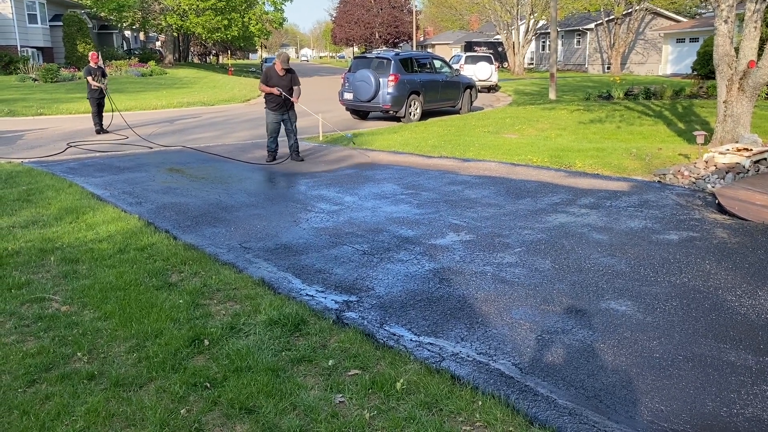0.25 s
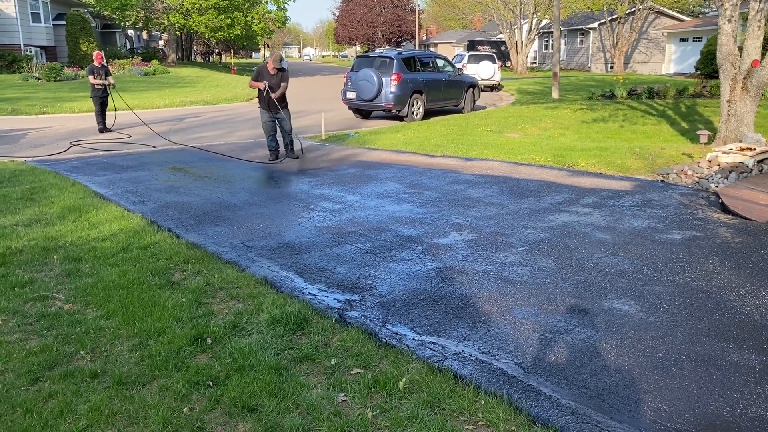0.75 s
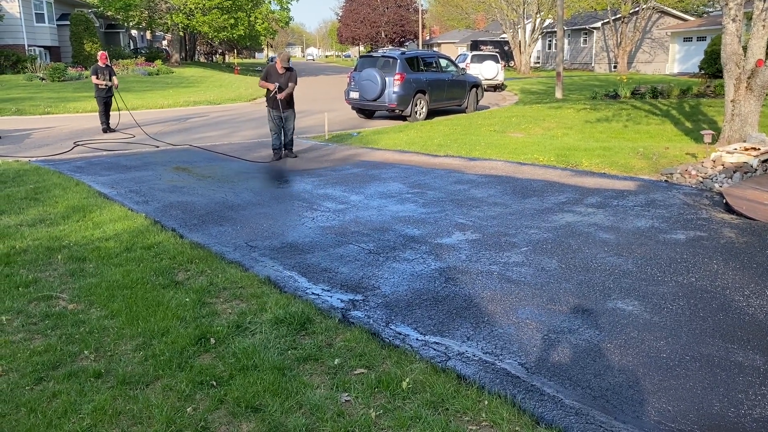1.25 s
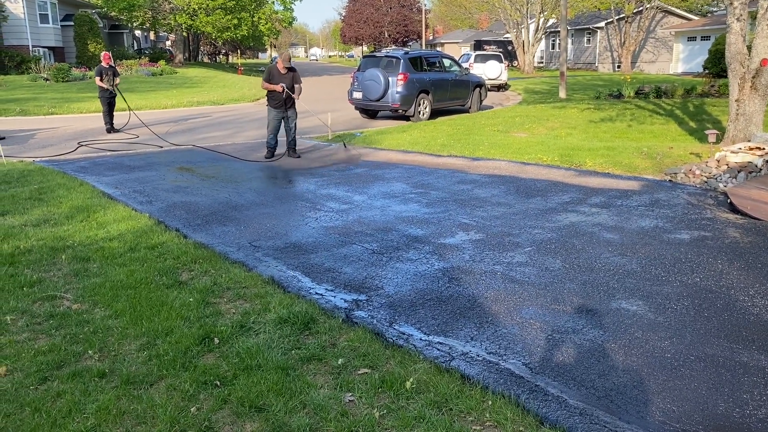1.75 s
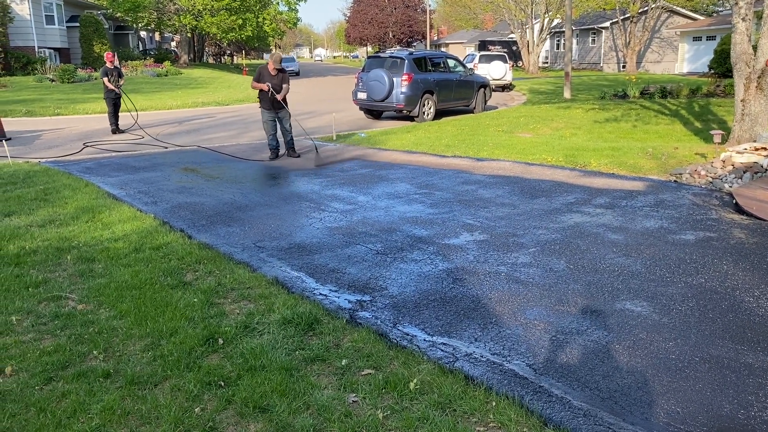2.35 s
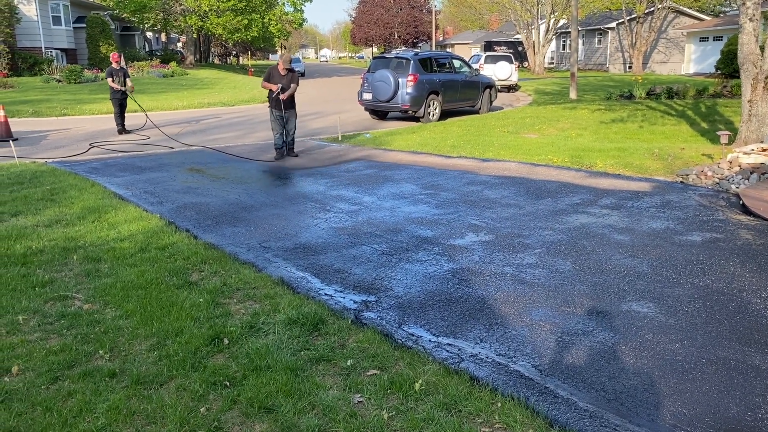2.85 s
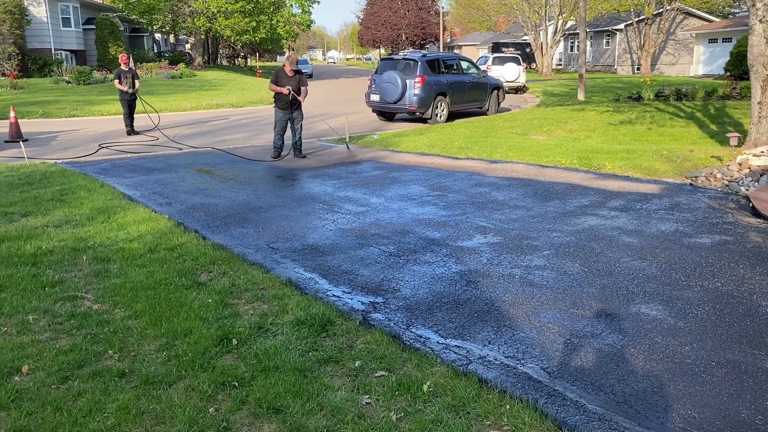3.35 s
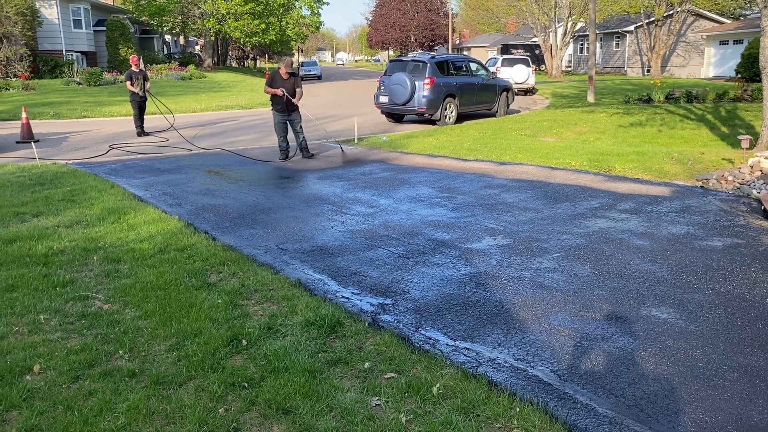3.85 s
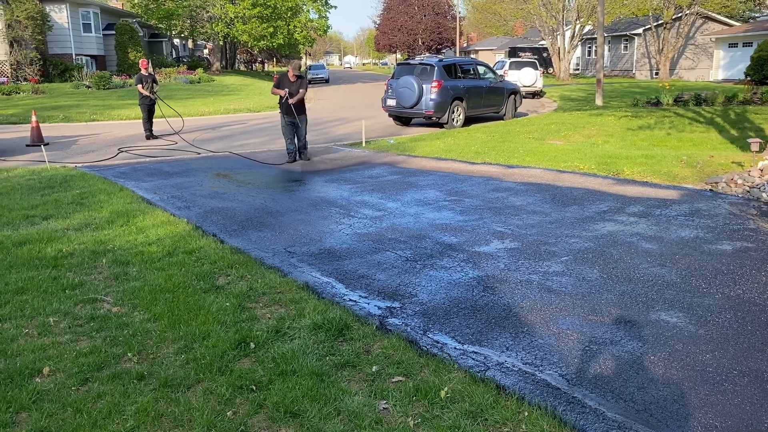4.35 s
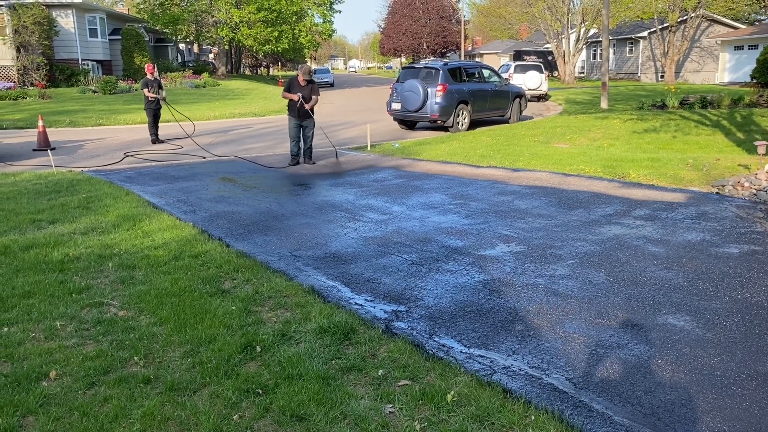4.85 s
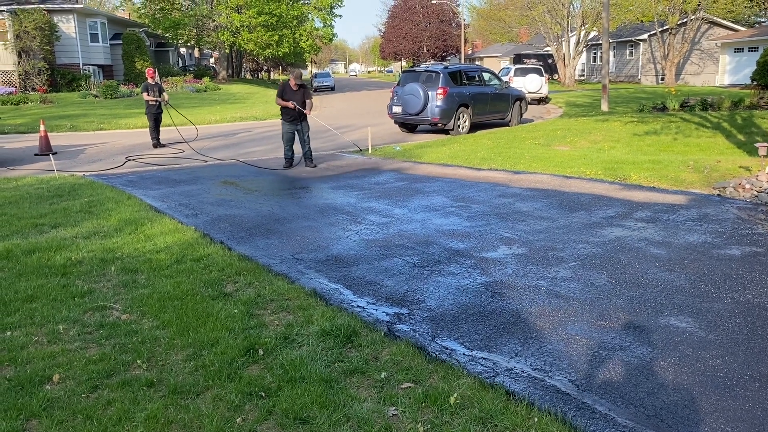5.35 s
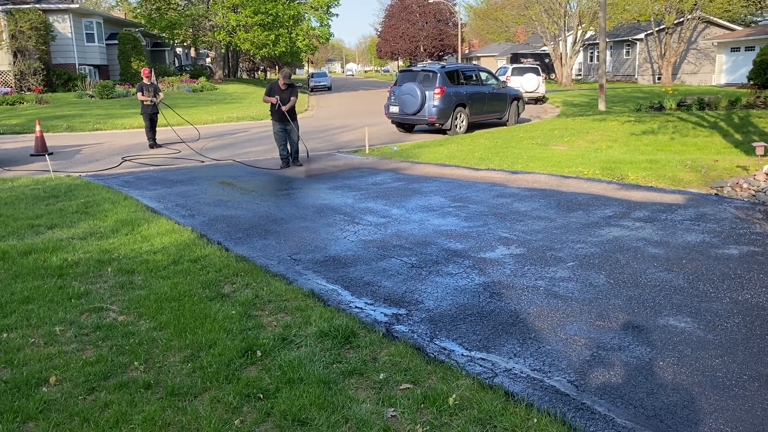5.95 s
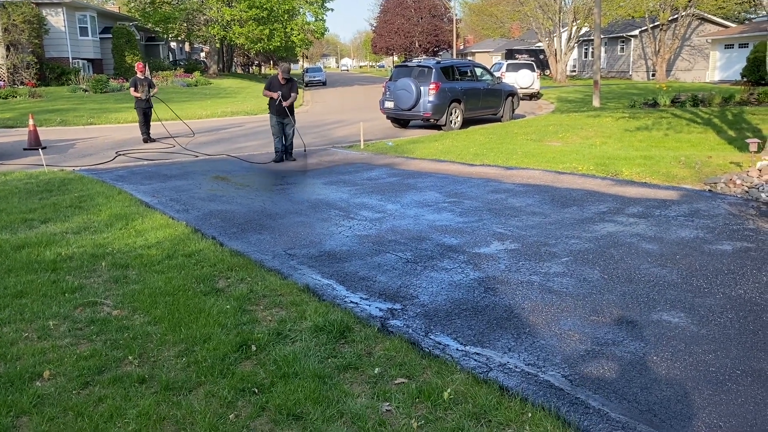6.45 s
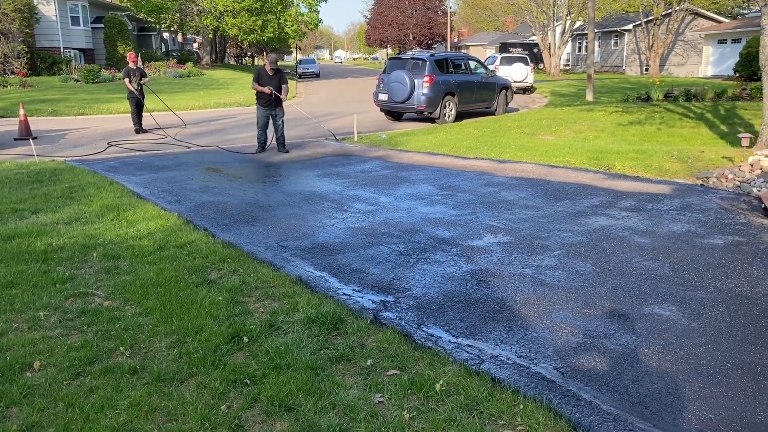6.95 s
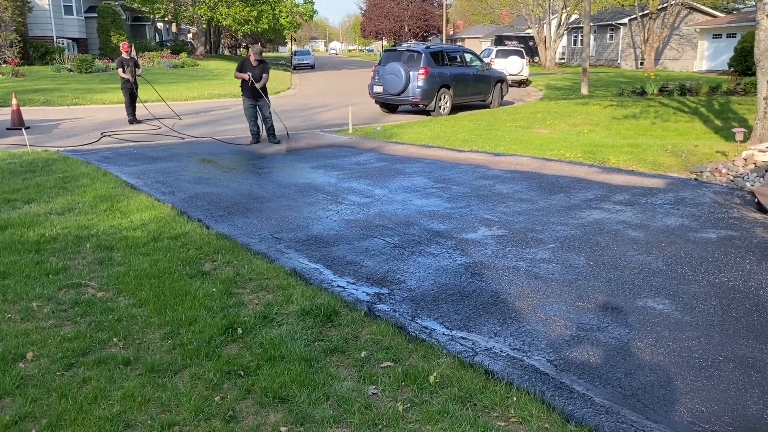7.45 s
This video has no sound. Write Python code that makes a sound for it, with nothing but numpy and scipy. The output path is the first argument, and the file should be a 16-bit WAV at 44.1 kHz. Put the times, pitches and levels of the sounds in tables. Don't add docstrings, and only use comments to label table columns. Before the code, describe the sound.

Continuous pressurised spray hisses over wet paving, sweeping brighter and duller with each stroke and interrupted by tiny gaps as the pump reverses. Under it runs an even, low, buzzing engine hum with a soft roar. The open-air hand-held microphone catches wind rumble throughout; in the last third, gusts strengthen, fingers tick on its case and several low thuds follow, with one strong knock shortly before the end.

```python
import sys
import numpy as np
from scipy import signal
from scipy.fft import rfft, irfft, next_fast_len
from scipy.io import wavfile
from scipy.ndimage import uniform_filter1d, map_coordinates

SR = 44100
rng = np.random.default_rng(int(sys.argv[2]) if len(sys.argv) > 2 else 0)


def volts_from_decibels(level):
    exponent = np.asarray(level, float) / 20
    return 10 ** exponent


def persist_wave(psi):
    counts = np.round(np.clip(psi, -1, 1) * 32767).astype(np.int16)
    wavfile.write(sys.argv[1], SR, np.atleast_2d(counts).T)


N = 339129
SIZE = next_fast_len(N + 4096)
HZ = np.maximum(np.arange(SIZE // 2 + 1) * SR / SIZE, 1)
TIME = np.arange(N) / SR

# (time [s], extra bounce path at the turn [mm],
# path in mid-stroke [mm], fan body at the turn [dB], fan body after it [dB])
WAND_TURNS = [(-.42, 97, 55, 0, 0), (.28, 80, 55, 6, 1.5), (1.1, 105.5, 64.5, 1, -2),
              (1.96, 80.7, 58, 5.5, 1.5), (2.8, 95.4, 59.4, 1, -0.5), (3.65, 78, 60.4, 5, 3),
              (4.54, 99, 58, 1, 1), (5.38, 77.6, 64, 5.5, -.5), (6.19, 95, 59, -1, -6),
              (7.08, 78, 49.5, 0.5, -5), (7.9, 100, 60, -8, -8)]
FAR_MM = 86
MID_STROKE_S = [0.32, .35]
FACING_FROM_S = [0.34, .1]
FACING_UNTIL_S = [0.028, .02]
SWEPT_AWAY_S = [0.31, 0.35]
TURN_DIP_DB, WRIST_S = -1, 0.1
STROKE_LIFT_DB = [0.4, 0.67]

# (stop time [s], restart time [s])
PUMP_REVERSALS = [
    (0.249, 0.305),
    (1.12, 1.169),
    (1.977, 2.025),
    (2.806, 2.859),
    (3.642, 3.696),
    (4.538, 4.587),
    (5.346, 5.396),
    (6.21, 6.262),
    (7.016, 7.064),
]
LINGER_DB = -16

# (frequency [Hz], level [dB per Hz])
SPRAY_SPECTRUM = [(900, -27), (1450, -2.5), (1800, -8), (2150, -5.5), (2700, -6), (3250, -4.5),
                  (3550, -2.5), (4300, -1), (5300, -1.5), (7000, -5), (8500, -5), (10000, -4.5),
                  (12500, -7.5), (16000, -10)]
SPRAY_DB = -38
# (frequency [Hz], level [dB])
PAVING_BOUNCE = [(3000, -0.5), (6000, -8.5), (9000, -5), (14000, -12.5)]
# (time [s], level [dB])
NOZZLE_AIM = [
    (0, -1),
    (1.5, 0.5),
    (2.1, -1),
    (3.3, -0.3),
    (5.2, 0.55),
    (6.1, 0),
    (6.77, 2.5),
    (7.1, 0),
    (7.69, 0),
]
KERB_MS, KERB_DB = 1.43, -12

# (time [s], firing rate [firings per s])
ENGINE_SPEED = [
    (0, 21.355),
    (2.2, 21.35),
    (2.4, 21.425),
    (4.6, 21.43),
    (4.8, 21.405),
    (7.69, 21.4),
]
# (multiple of the firing rate, level [dB])
EXHAUST = [(1, -26), (2, -65.5), (3, -36), (4, -4.5), (5, 1), (6, -7.5), (7, -8.5), (8, -12), (9, -10.5),
           (10, -7), (11, -16), (12, -17.5), (13, -13), (14, -19), (15, -20), (16, -17), (17, -24.5),
           (18, -28), (19, -31.5), (20, -40), (21, -53), (22, -34), (23, -50), (24, -33), (25, -22.5),
           (26, -28), (27, -31), (28, -43), (29, -37), (30, -29), (31, -35), (32, -31), (33, -27),
           (34, -25), (35, -28), (36, -25), (37, -33), (38, -26), (39, -26.5), (40, -21), (41, -20),
           (42, -24), (43, -50), (44, -47), (45, -44), (46, -26.5), (47, -21), (48, -24), (49, -40),
           (50, -25.5), (51, -22), (52, -22)]
EXHAUST_DB, SCATTER_RAD = -34, .4
# (frequency [Hz], level [dB per Hz])
ROAR_SPECTRUM = [(45, -26), (85, -16.5), (150, -5), (300, -14), (620, -20.5), (900, -13), (1200, -21),
                 (1450, -23.5), (1720, -25), (2050, -20.5), (2800, -25), (3500, -25), (5500, -32.5),
                 (16000, -38)]
ROAR_DB = -39
# (frequency [Hz], level [dB])
ROAR_DIFFUSE = [(50, -25), (300, -0.5), (900, -6.5), (1500, 5), (2500, 0.5), (5000, 2), (16000, -13)]
# (time [s], level [dB])
ENGINE_FACING = [
    (0, -0.7),
    (1, -0.23),
    (5, 0.3),
    (5.5, -.5),
    (7, -1.5),
    (7.69, -1),
]

# (start time [s], hold [s], level [dB])
GUSTS = [(0, .02, -39), (.2, .03, -33), (.85, .02, -42), (1.8, 0.19, -36), (2.08, .12, -45),
         (2.2, 0.17, -35), (2.727, 0.015, -36), (3.484, 0.022, -37), (3.658, 0.21, -33.5), (4.58, .04, -45),
         (4.89, 0.045, -38), (5.25, .05, -37), (5.437, .1, -29.5), (5.627, 0.27, -30), (5.845, 0.32, -31.5),
         (6.2, 0.11, -29), (6.47, 0.34, -35), (6.955, 0.042, -31.5), (7.133, 0.18, -28.5),
         (7.33, 0.21, -31.5), (7.643, .1, -28)]
CALM_DB, RISE_DB_PER_S, FALL_DB_PER_S = -42, 200, 154

# (time [s], peak level [dB], frequency [Hz], 60 dB decay time [s])
BUMPS = [(5.489, -12.5, 70, .1), (5.677, -16, 62, .09), (6.684, -13.5, 55, .09), (5.724, -21, 75, .06),
         (6.27, -21, 55, .08), (7.66, -20, 48, .1), (6.216, -20, 90, .05), (6.312, -21, 120, .06),
         (6.965, -21, 120, .06), (7.405, -21, 80, .05), (7.279, -11, 140, .03), (7.2864, -3, 100, .06),
         (7.2866, -9, 350, .026), (7.2866, -20, 560, .02)]
# (time [s], peak level [dB], frequency [Hz])
TICKS = [
    (5.389, -36, 1000),
    (5.397, -34.5, 990),
    (5.397, -39.5, 2200),
    (5.479, -37.5, 890),
    (5.479, -43, 2450),
    (5.517, -37, 1800),
    (5.541, -42, 800),
]

# (frequency [Hz], phase [radians])
PORT_LEAD = [(0, 0), (110, .27), (330, .6), (900, 1.25), (1250, 2.9), (1480, 1.3), (1800, 3.3), (2330, 6.6),
             (4000, 6.8), (5340, 7.75), (6290, 7.0), (7100, 6.25), (9000, 3.14), (11200, 0), (13350, -3.14),
             (15400, -6.3), (22050, -15.7)]
# (frequency [Hz], phase [radians])
SWING_LEAD = [(3300, 0.43), (4500, 0.38), (5600, 1.9), (7000, 1.54), (8400, 0)]
# (frequency [Hz], left minus right [dB])
PORT_BALANCE = [(60, .5), (250, 1), (420, 1.5), (620, 5.5), (1050, 4.5), (1400, 0), (2000, 0), (2700, 1.5),
                (6300, .5), (7200, 2.3), (8300, 0)]


def rms_one(x):
    return x / np.sqrt(np.mean(x ** 2) + 1e-20)


def in_time(rows):
    s, *columns = np.transpose(rows)
    return [np.interp(TIME, s, c) for c in columns]


def at_hz(points, hz):
    table_hz, value = np.transpose(points)
    return np.interp(np.log(hz), np.log(table_hz), value)


def colour(x, spectrum):
    return irfft(rfft(x, SIZE) * volts_from_decibels(at_hz(spectrum, HZ)), SIZE)[..., :N]


def drift(rate):
    r = np.exp(-80 * np.pi * rate / SR)
    noise = rng.standard_normal(N // 40 + 2002)
    slow = signal.lfilter([1], [1, -2 * r, r * r], noise)[2000:]
    return np.interp(np.arange(N) / 40, np.arange(len(slow)), rms_one(slow))


def ports(x, turned=0):
    lead = np.interp(HZ, *np.transpose(PORT_LEAD)) + turned * np.interp(HZ, *np.transpose(SWING_LEAD))
    half = volts_from_decibels(at_hz(PORT_BALANCE, HZ) / 2) * np.exp(.5j * lead)
    return irfft(rfft(x, SIZE) * np.array([half, 1 / half]), SIZE)[:, :N]


def engine():
    turn = np.cumsum(in_time(ENGINE_SPEED)[0]) / SR + .47 + .002 * drift(3)
    order, db = np.transpose(EXHAUST)
    valley = np.clip((np.roll(db, 1) + np.roll(db, -1)) / 6 - db / 3, 0, 1)
    lead = .35 * valley * (order < 13)
    lead -= .41 * (order - 13) * (order > 13) * (order < 22)
    scatter = SCATTER_RAD * np.where(order > 38, 2.3, 1) * rng.standard_normal(len(order))

    cycle = np.arange(4097) / 4096
    phase = 2 * np.pi * (np.outer(order, cycle) + .2 + lead[:, None]) + scatter[:, None]
    waves = volts_from_decibels(db)[:, None] * np.cos(phase)
    exhaust = np.zeros(N)
    for k in range(5):
        blow = waves[k::5].sum(axis=0)
        exhaust += np.interp(turn % 1, cycle, blow) * volts_from_decibels(1.4 * drift(9))
    exhaust *= volts_from_decibels(EXHAUST_DB) * np.sqrt(2)

    puff = 1 + 0.11 * np.cos(2 * np.pi * turn)
    shared, left, right = colour(rng.standard_normal((3, N)), ROAR_SPECTRUM) * puff * volts_from_decibels(.5 * drift(8.1))
    roar = rms_one(ports(shared) + colour(np.array([left, right]), ROAR_DIFFUSE))
    return volts_from_decibels(in_time(ENGINE_FACING)[0]) * (ports(exhaust) + volts_from_decibels(ROAR_DB) * roar)


def wand():
    s, turn_mm, mid_mm, turn_db, after_db = np.transpose(WAND_TURNS)
    far = (turn_mm > FAR_MM).astype(int)

    def through(times, values):
        line = np.interp(TIME, np.ravel(times, "F"), np.ravel(values, "F"))
        return uniform_filter1d(line, size=round(WRIST_S * SR), mode="nearest")

    stroke_s = [s, s + np.take(MID_STROKE_S, far)]
    faces_s = s - np.take(FACING_FROM_S, far)
    leaves_s = s + np.take(FACING_UNTIL_S, far)
    swept_s = s + np.take(SWEPT_AWAY_S, far)
    path_mm = through(stroke_s, [turn_mm, mid_mm])
    level_db = through(stroke_s, [TURN_DIP_DB + 0 * s, np.take(STROKE_LIFT_DB, far)])
    body_db = through([faces_s, leaves_s, swept_s], [turn_db, turn_db, after_db])
    return path_mm, level_db, body_db


def flow():
    gate = np.ones(N)
    for stop, start in PUMP_REVERSALS:
        lingering = volts_from_decibels(LINGER_DB) * np.exp(-(TIME - stop) / 0.016)
        sag = lingering + np.exp(-(TIME - stop + 0.0096) / .004)
        gate = np.where((TIME > stop - .008) & (TIME < start), np.minimum(sag, 1), gate)
        gate *= 1 + 0.066 * (TIME >= start) * np.exp(-np.abs(TIME - start) / 0.012)
    return gate


def spray(path_mm, level_db, body_db):
    hiss = rms_one(colour(rng.standard_normal(N), SPRAY_SPECTRUM))
    body = signal.sosfilt(signal.butter(1, [3600, 7000], "band", fs=SR, output="sos"), hiss)
    hiss = hiss + (volts_from_decibels(body_db) - 1) * body
    flutter_db = .5 * drift(5.1) + 0.54 * drift(90)
    hiss = hiss * flow() * volts_from_decibels(SPRAY_DB + level_db + in_time(NOZZLE_AIM)[0] + flutter_db)

    late = np.arange(N) - path_mm * SR / 343000
    bounce = map_coordinates(colour(hiss, PAVING_BOUNCE), [late], order=3, mode="nearest")
    heard = hiss + bounce
    kerb = colour(np.roll(heard, round(KERB_MS * SR / 1000)), [(6000, -7.0), (9000, -26)])
    return heard + volts_from_decibels(KERB_DB) * kerb


def swinging_spray():
    path_mm, level_db, body_db = wand()
    hiss = spray(path_mm, level_db, body_db)
    out = np.clip((path_mm - 70.) / 28.4, 0, 1)
    return ports(hiss * (1 - out)) + ports(hiss * out, turned=0.9)


def gusts():
    level_db = np.full(N, float(CALM_DB))
    for s, hold, db in GUSTS:
        before_s, after_s = np.maximum(s - TIME, 0), np.maximum(TIME - s - hold, 0)
        level_db = np.maximum(level_db, db - RISE_DB_PER_S * before_s - FALL_DB_PER_S * after_s)
    return level_db


def breeze():
    band = signal.butter(1, [40, 85], "band", fs=SR, output="sos")
    rumble = signal.sosfilt(band, rng.standard_normal((2, N)))
    mid, side = colour(rumble, [(130, 4.5), (260, -9), (500, -60)])
    mid = mid / np.sqrt(uniform_filter1d(mid ** 2, size=3000) + 0.099 * np.mean(mid ** 2))
    return volts_from_decibels(gusts() - 1.0) * (rms_one(mid) + 0.35 * rms_one(side) * [[1], [-1]])


def ring(clicks, hz, t60):
    r, w = volts_from_decibels(-60 / (t60 * SR)), 2 * np.pi * hz / SR
    return signal.lfilter([0, np.sin(w)], [1, -2 * r * np.cos(w), r * r], clicks + 1e-18)


def handling():
    out, after = np.zeros((2, N + SR)), np.arange(SR // 5) / SR
    for s, db, hz in TICKS:
        scratch = np.sign(rng.standard_normal(len(after))) * np.exp(-after / 0.0025)
        tick = volts_from_decibels(db - 34.5) * rms_one(ring(scratch, hz, 0.0027)) * 10
        out[:, round(s * SR):][:, :len(after)] += tick * volts_from_decibels([[-3], [3]])
    for s, db, hz, t60 in BUMPS:
        decay = volts_from_decibels(db - 60 * after / t60)
        bump = decay * np.sin(2 * np.pi * hz * after) * (1 - np.exp(-after / .0012))
        out[:, round(s * SR):][:, :len(after)] += bump
    return out[:, :N]


def scene():
    return engine() + swinging_spray() + breeze() + handling()


def band_limit(x):
    return signal.sosfilt(signal.butter(12, 16890, fs=SR, output="sos"), x)


def record(dry):
    low_cut = signal.butter(3, 38, "high", fs=SR, output="sos")
    mix = colour(signal.sosfilt(low_cut, dry), [(15720, 0), (15780, -60)])
    return band_limit(mix)


dry = scene()
out = record(dry)
persist_wave(out)
```